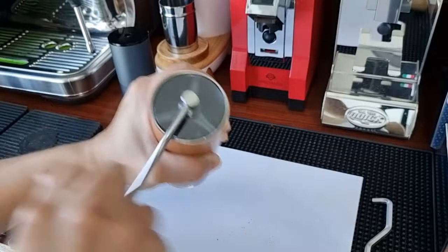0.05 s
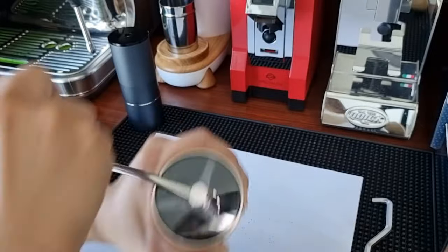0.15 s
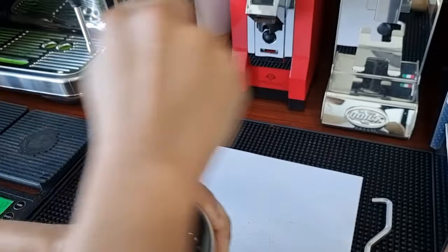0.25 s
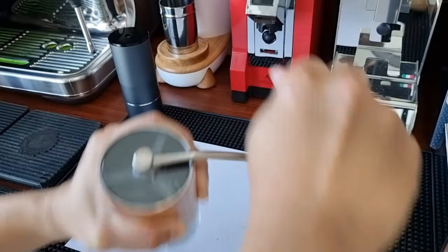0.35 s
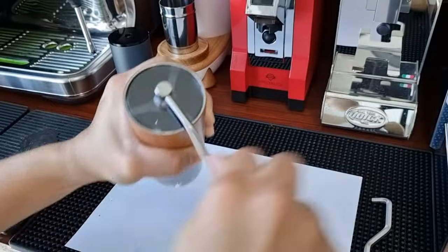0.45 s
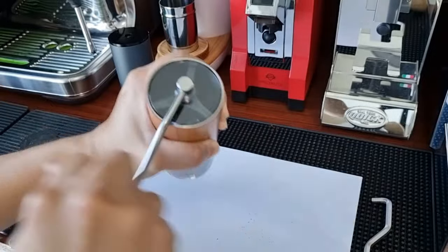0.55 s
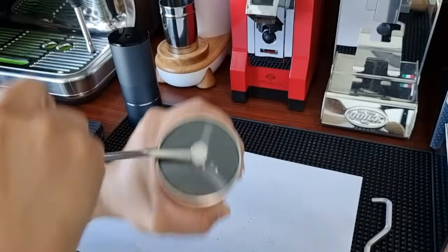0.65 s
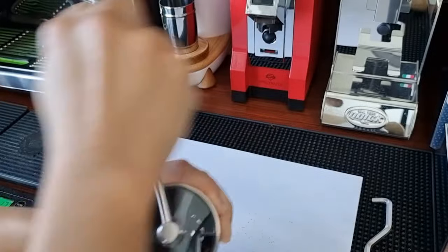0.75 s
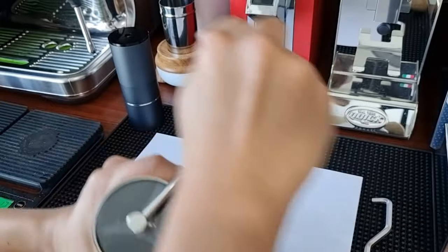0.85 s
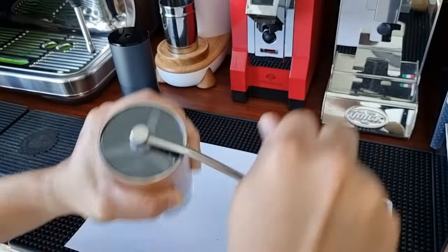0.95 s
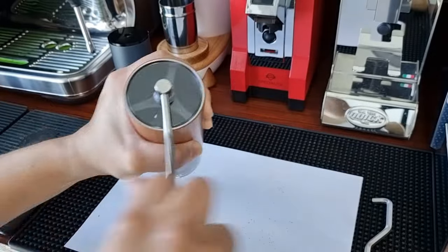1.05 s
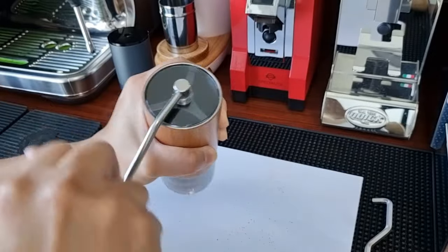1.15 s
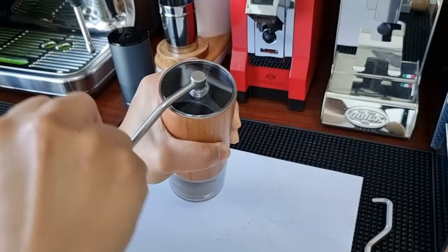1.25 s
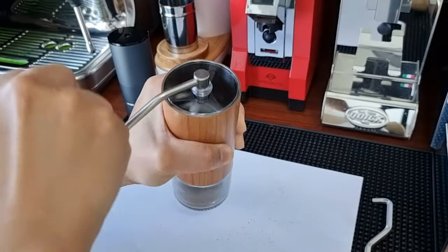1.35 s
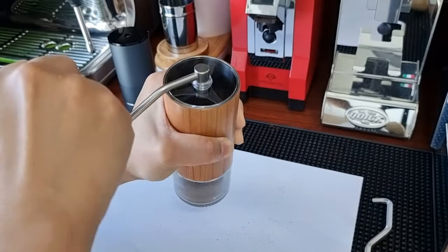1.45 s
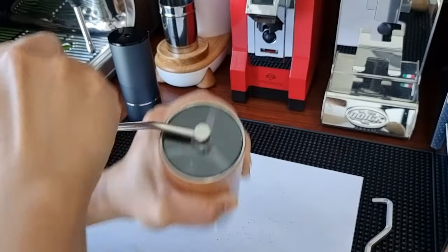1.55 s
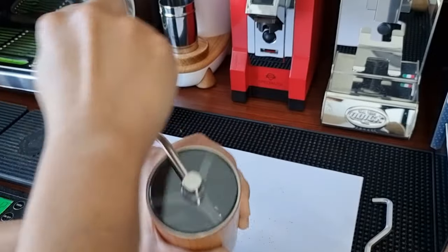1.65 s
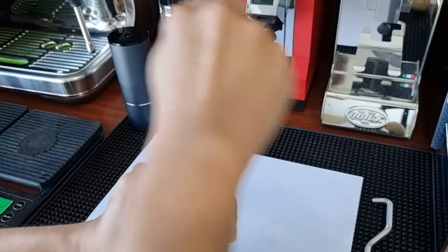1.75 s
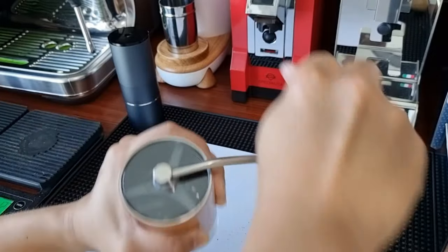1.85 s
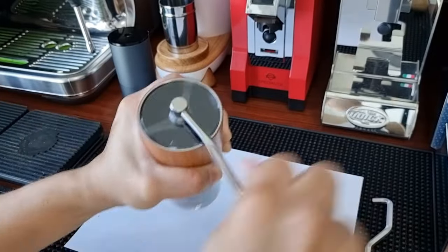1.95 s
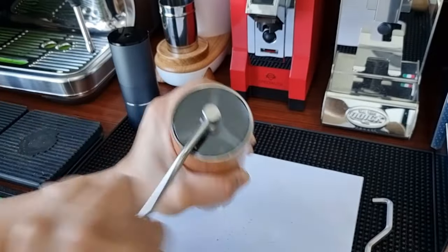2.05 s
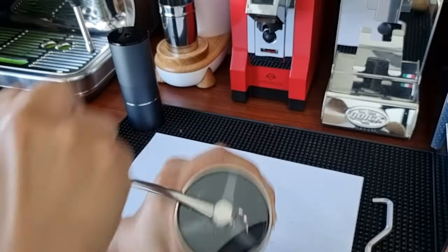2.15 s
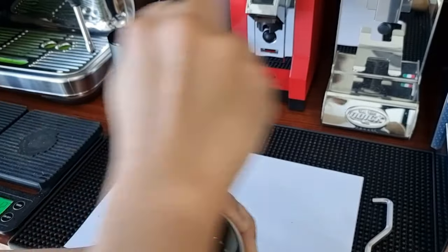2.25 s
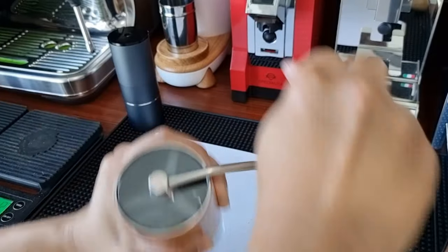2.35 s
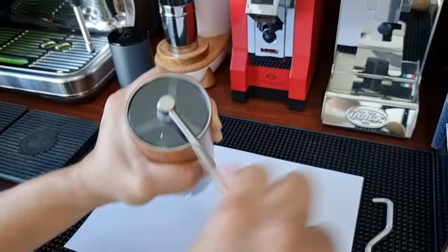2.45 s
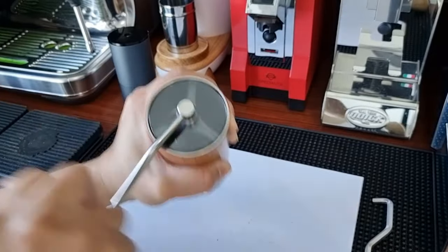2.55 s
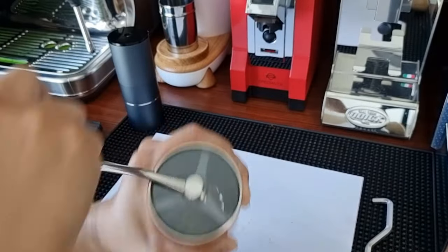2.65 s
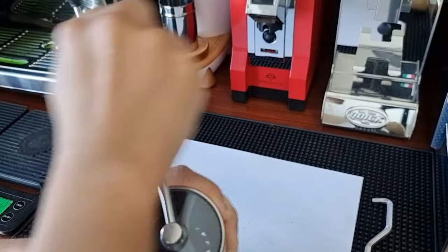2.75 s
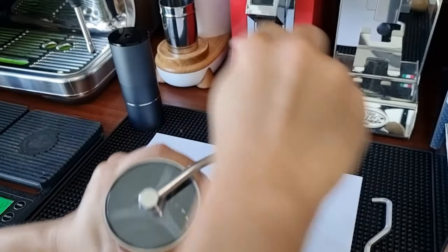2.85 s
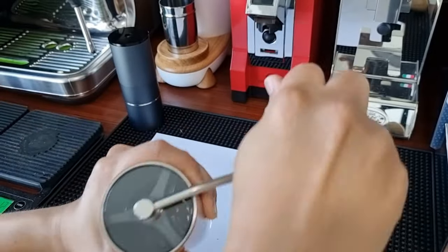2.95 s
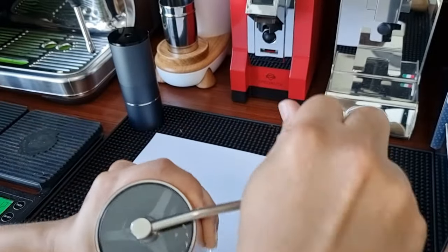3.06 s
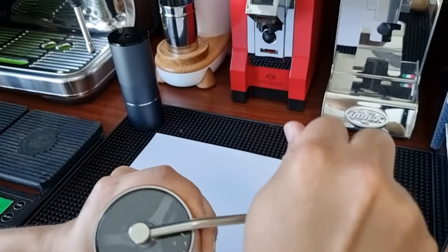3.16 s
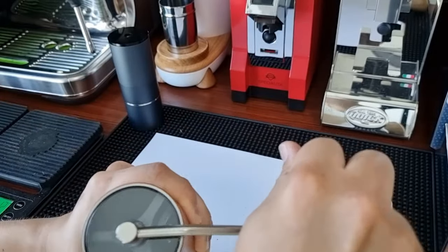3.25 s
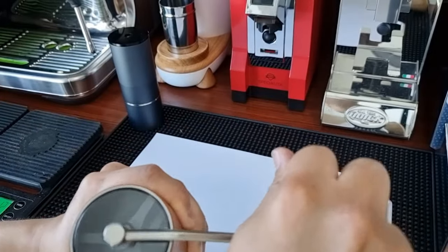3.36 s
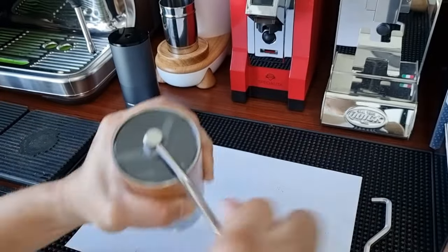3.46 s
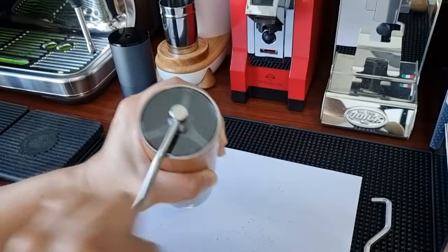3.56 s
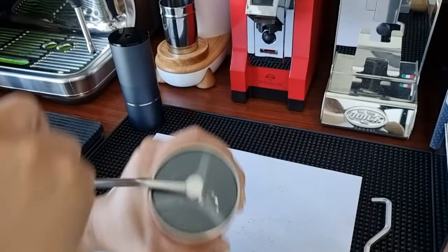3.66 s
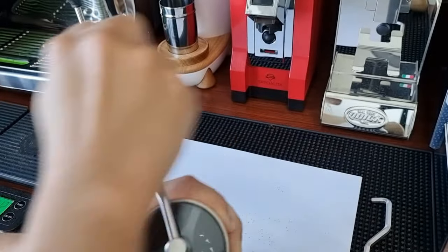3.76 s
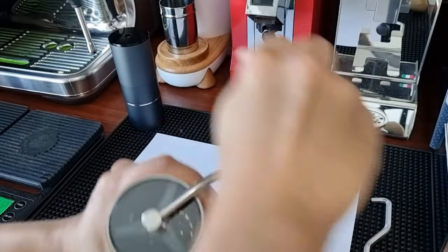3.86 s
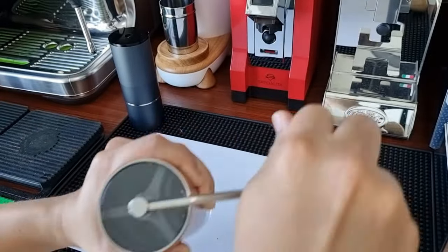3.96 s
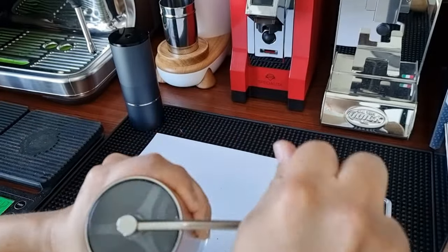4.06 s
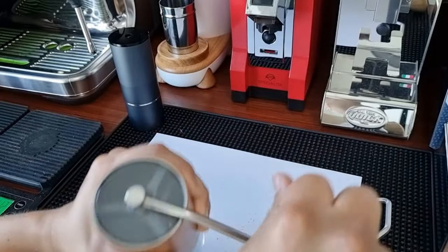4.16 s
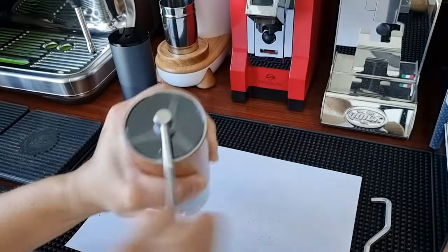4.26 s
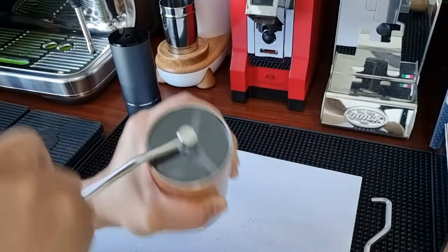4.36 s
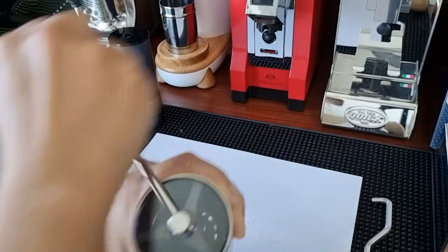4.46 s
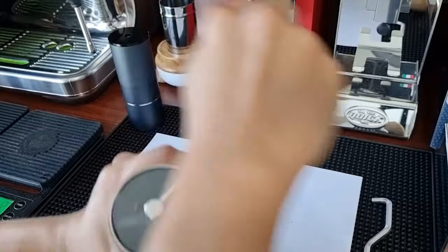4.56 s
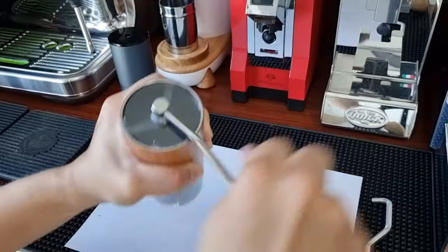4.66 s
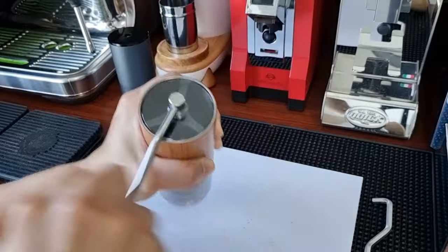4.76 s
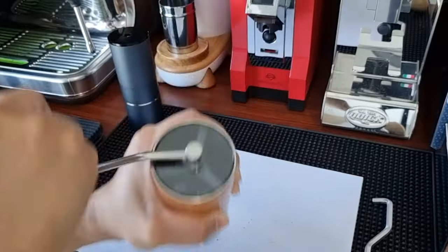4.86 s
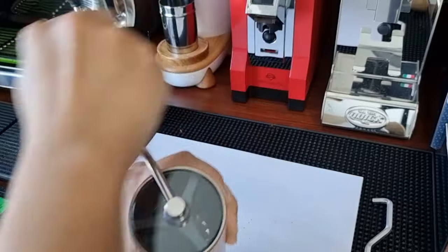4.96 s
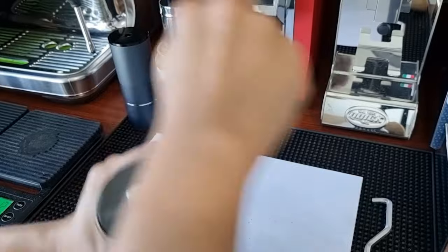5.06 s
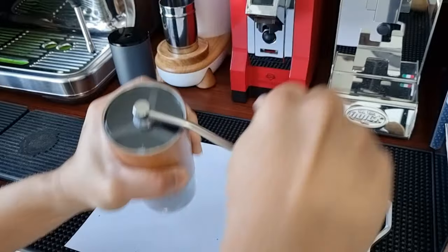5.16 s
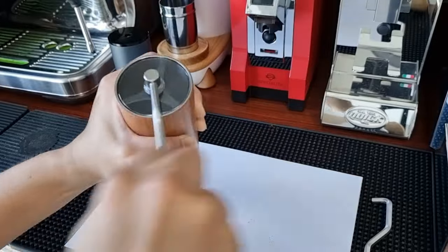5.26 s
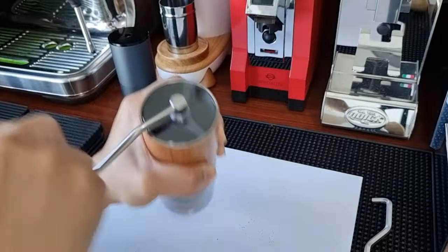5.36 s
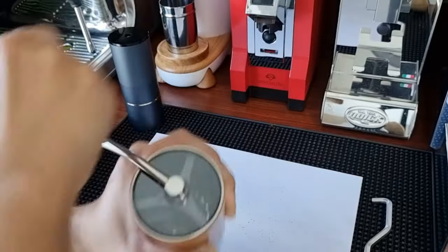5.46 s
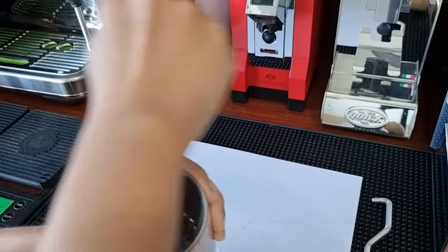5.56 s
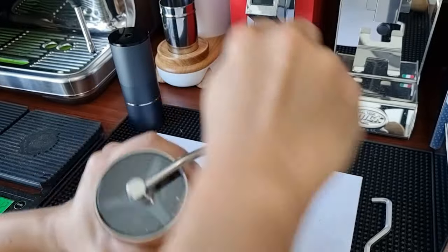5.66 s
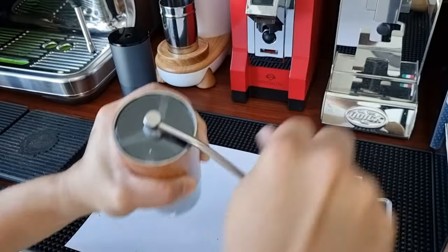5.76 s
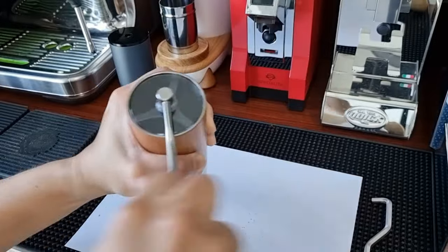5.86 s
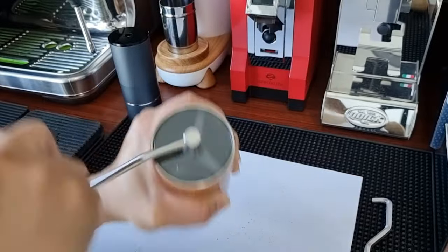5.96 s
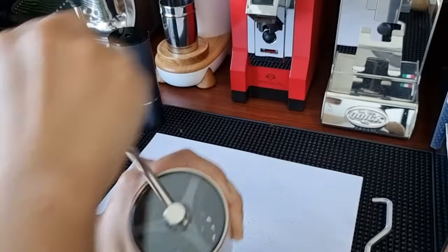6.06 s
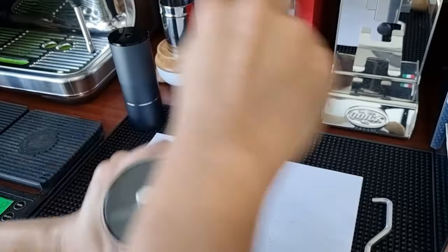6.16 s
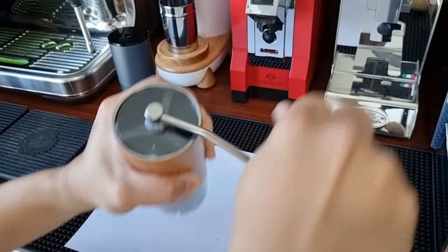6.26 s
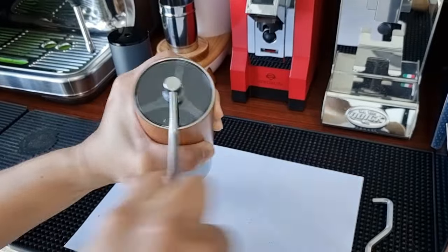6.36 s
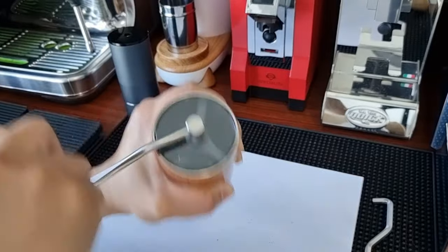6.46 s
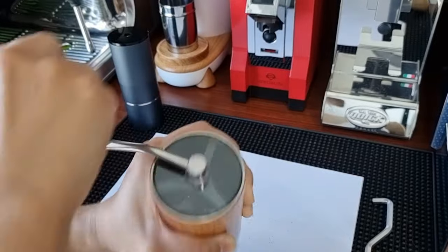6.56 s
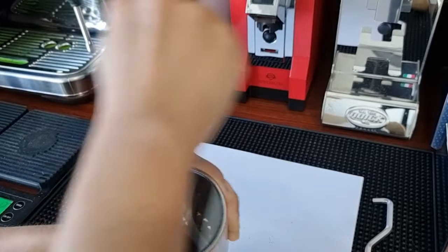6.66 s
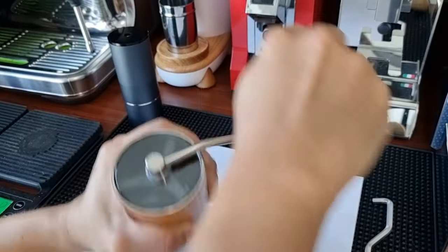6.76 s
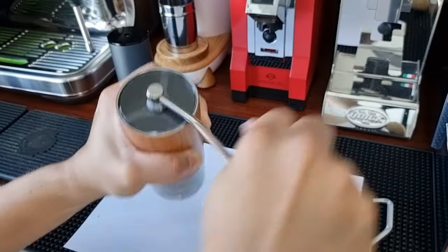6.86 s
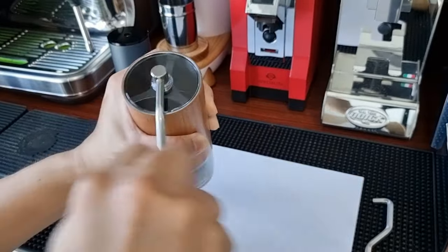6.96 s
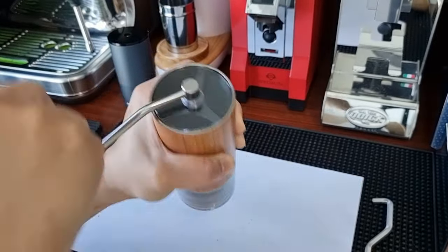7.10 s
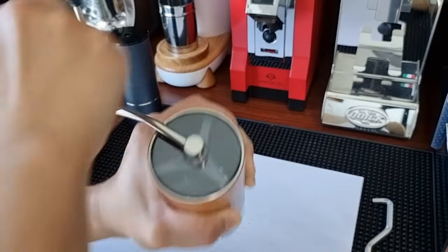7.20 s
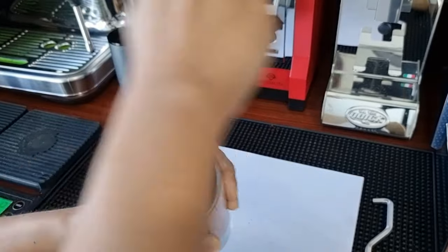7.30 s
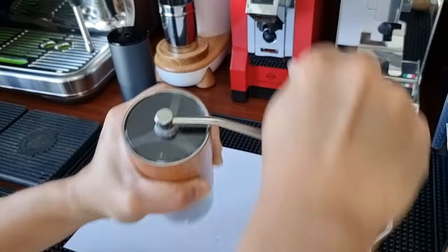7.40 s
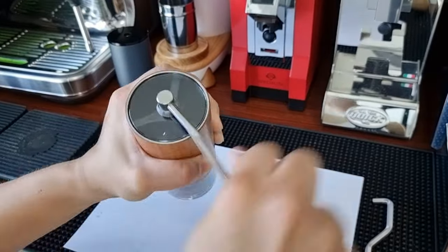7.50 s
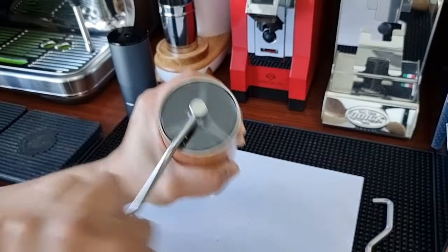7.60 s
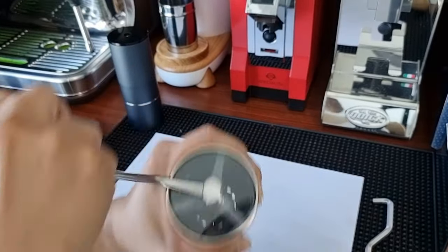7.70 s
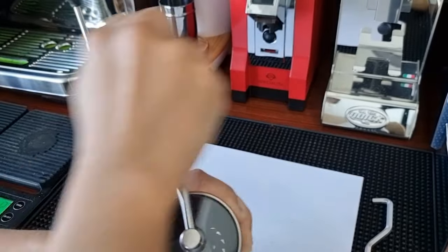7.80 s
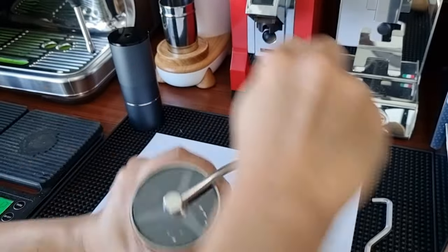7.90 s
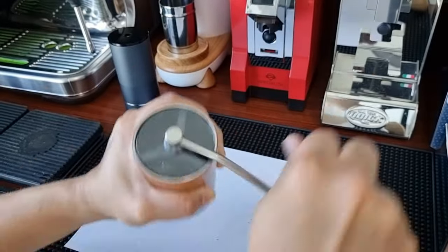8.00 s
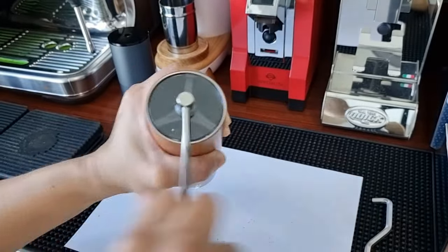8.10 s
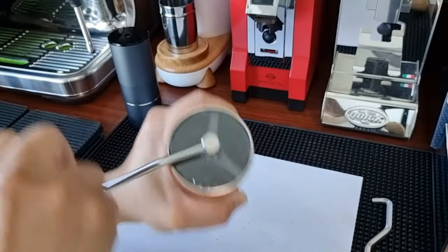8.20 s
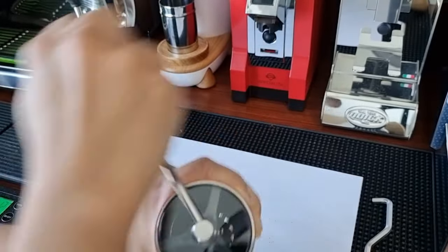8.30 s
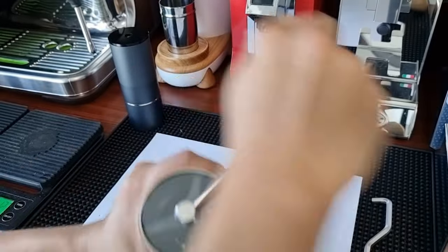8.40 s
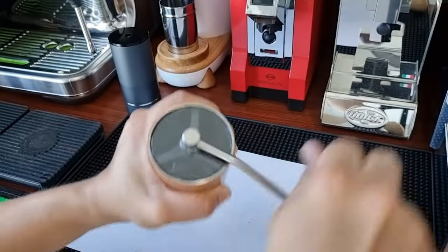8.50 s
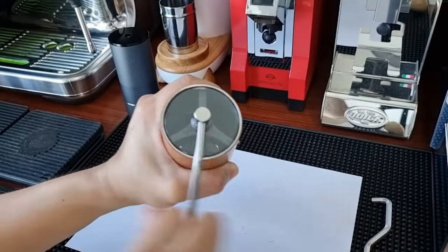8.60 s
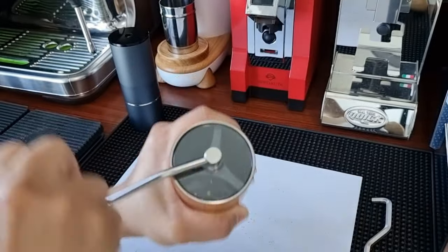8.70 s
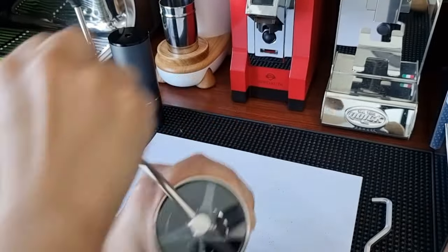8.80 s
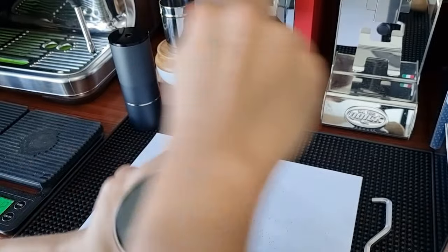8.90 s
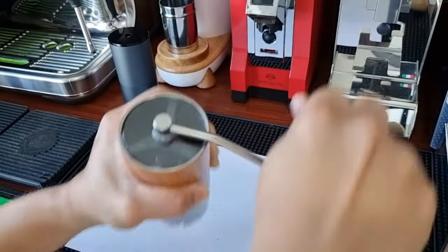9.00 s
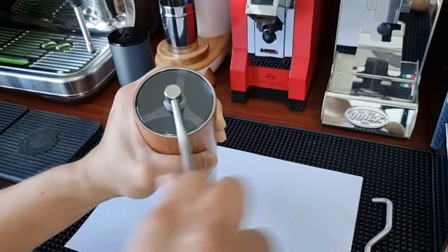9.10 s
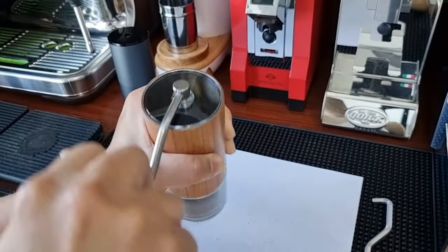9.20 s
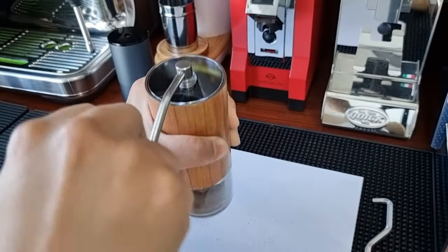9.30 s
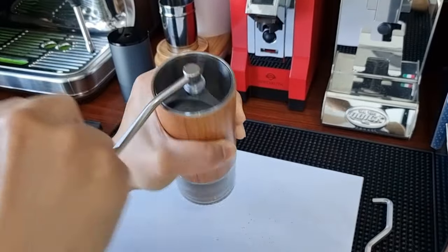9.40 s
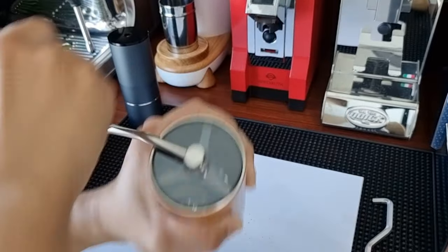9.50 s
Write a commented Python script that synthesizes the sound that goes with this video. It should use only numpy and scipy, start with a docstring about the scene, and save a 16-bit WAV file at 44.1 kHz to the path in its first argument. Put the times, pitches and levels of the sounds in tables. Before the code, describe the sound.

A hand coffee grinder is already turning at 0 s, very close, in a small quiet room with short reflections. Steel burrs crush beans in a dense, gritty crackle that swells about twice a second with each push: hollow barrel knocks, hard snaps, metallic rattle and bright splinters. Around 1.2 s it jams, giving a few short strained scrapes, then near silence until 1.6 s. Grinding resumes until about 3.0 s, stops, ticks sharply at 3.25 s, and restarts with a loud crack near 3.45 s. Another short pause falls at 4.0-4.2 s. From there it runs almost continuously to 9.2 s, uneven, with scattered loud cracks and faint high steel ringing on jolts, the crunch gradually thinning. It falters around 9.3 s, then bites again from 9.4 s to the end. Low soft room noise and a faint deep hum remain beneath, exposed in the gaps.

```python
"""A hand coffee grinder is cranked in a small quiet room, stalling briefly a few times.
Random clicks stand for beans cracking between steel burrs: each fracture knocks the resonant hollow barrel
and sends a spray of splinters through the metal shell, while denser clicks scrape along as fine grit.
A narrow mode of the steel crank rings faintly and flares at jolts. Early reflections and a short diffuse
tail give the room, over shaped noise and a faint sine hum."""
import sys
import numpy as np
from scipy import signal
from scipy.fft import rfft, irfft
from scipy.io import wavfile
from scipy.ndimage import uniform_filter1d

SR = 44100
rng = np.random.default_rng(int(sys.argv[2]) if len(sys.argv) > 2 else 0)


def master(y):
    """Save y as 16-bit WAV."""
    cut = np.clip(np.atleast_2d(y).T, -1, 1)
    pcm = np.round(cut * 32767)  # scale
    wavfile.write(sys.argv[1], SR, pcm.astype(np.int16))


N = 420698  # length in samples

# spectrum of splinters snapping off, before their levels are set: f/Hz, level/dB
SPLINTER_SPECTRUM = [(2500, -23), (6000, 0.5), (8500, -7.5), (10500, 0), (11300, -6.5), (12600, -6.5),
                     (13200, -7.5), (15500, -5.5)]


def amp(db):
    """Decibels to gain."""
    return 10 ** (np.asarray(db) / 20)


def evened(x):
    """Scales to rms 1."""
    return x / np.sqrt(np.mean(x ** 2) + 1e-20)


def peaked(x):
    """Scales to peak 1."""
    return x / abs(x).max()


def read(points, hz):
    """Reads a table on a log-frequency axis."""
    f, value = np.transpose(points)
    return np.interp(np.log(hz + 1), np.log(f + 1), value)


def over_time(rows):
    """A level curve in dB as a gain for every sample."""
    return amp(np.interp(np.arange(N) / SR, *np.transpose(rows)))


def wander(seconds):
    """A random curve between -1.11 and 1 that glides to a new value at this interval."""
    knots = np.arange(0, N, seconds * SR)
    values = rng.uniform(-1.11, 1, N)[:len(knots)]
    return np.interp(np.arange(N), knots, values)


def add(mix, s, sound):
    """Mixes a sound in at time s."""
    part = mix[max(round(s * SR), 0):][:len(sound)]
    part += sound[:len(part)]


def ring(x, spectrum, size=2048):
    """Passes x through a body with this spectrum, which rings only after it is struck (minimum phase)."""
    log_gain = np.log(amp(read(spectrum, abs(np.fft.fftfreq(size, 1 / SR)))))
    response = np.fft.ifft(np.exp(np.conj(signal.hilbert(log_gain)))).real
    return signal.oaconvolve(x, response[:size // 2])[:len(x)]


def steadied(x, seconds):
    """Keeps the power near 1 over this time, leaving faster bumps as they are."""
    size = max(int(seconds * SR), 8)
    power = abs(uniform_filter1d(uniform_filter1d(x ** 2, size), size))
    return x / np.sqrt(power + 1e-9 * np.mean(x ** 2))


def effort():
    """Load, crunch and deep share swing with each push, swell on large pieces and die away in stalls."""
    # spells in which the burrs move; the short ones strain against a stuck bean:
    # start/s, end/s, relative level/dB
    spells = [(0, 1.19, 0), (1.206, 1.24, -2.5), (1.285, 1.32, -5.5), (1.352, 1.367, -1),
              (1.588, 1.68, 0.5), (1.68, 1.78, -2.5), (1.8, 2.985, 0.5), (3.236, 3.29, -19),
              (3.31, 3.322, -11), (3.465, 4.005, -2.5), (4.181, 4.22, -8), (4.234, 6.617, 0.5),
              (6.615, 6.68, -9), (6.666, 9.24, 1), (9.24, 9.3, -5.5), (9.402, 9.44, -15),
              (9.436, 9.55, -6.5)]
    # one push of the arm for each turn of the crank:
    # t/s, load on the burrs before the mix trim/dB, lean toward the deep resonance/dB
    pushes = [(-0.04, -19, -2), (0.42, -21.5, 2.5), (1.0, -20.5, 2), (1.42, -28.5, -4.5), (1.97, -21.5, 1),
              (2.45, -21, 4), (2.88, -25, 1), (3.52, -17, 1), (3.92, -22, 3), (4.37, -24.5, 6.5),
              (4.68, -24, 1.5), (5.25, -22.5, 0.5), (5.84, -25, 2), (6.32, -22, 1), (6.86, -23.5, -0.5),
              (7.45, -24, 1), (8.01, -22, 0), (8.49, -24.5, 0.5), (8.97, -27, 0.5), (9.56, -19.5, -1.5)]
    # crunch of the fragments, mostly fading as the beans run low: t/s, level before the mix trim/dB
    crunch_curve = [(0, -31), (0.9, -31), (1.15, -33.5), (1.8, -31), (2.5, -34), (3.6, -28.5), (5.0, -32.5),
                    (6.5, -33), (8.4, -34), (8.65, -36.5), (8.9, -36.5), (9.1, -41), (9.54, -33)]
    # a large piece is crushed in one swell, levels at its peak and before the mix trim:
    # middle/s, half length/s, load/dB, crunch/dB, deep share of the barrel/dB
    crushes = [(0.11, 0.046, -31, -44, -12), (0.417, 0.047, -16, -29.5, -8.5), (1.006, 0.029, -18, -32, -4),
               (1.189, 0.016, -20, -40, -21), (1.622, 0.03, -19.5, -44, -20), (1.904, 0.064, -29, -31, -1),
               (2.058, 0.1, -23.5, -49, -9), (2.24, 0.066, -24, -36, -7), (2.952, .05, -18, -29.5, -5),
               (3.268, .012, -25, -33, -12), (3.456, .012, -25, -22, -8), (3.59, 0.023, -24, -40, -4),
               (3.943, 0.064, -18, -29, 0.5), (4.327, 0.11, -22.5, -34.5, -2),
               (4.522, 0.13, -23.5, -38, -2), (4.862, 0.015, -20.5, -28.5, -18),
               (5.031, 0.097, -19.5, -32, -7), (5.226, 0.068, -21, -32, -2.5),
               (5.445, 0.052, -25, -32.5, -17), (5.561, 0.075, -22.5, -44, -5),
               (5.79, 0.04, -20.5, -31, -3), (6.231, 0.059, -22.5, -31, -1.5),
               (6.465, .06, -17.5, -29.5, -9), (6.694, .04, -24.5, -34.5, -12), (6.97, .06, -23, -33.5, 0),
               (7.21, 0.089, -22.5, -35, -24), (7.715, 0.073, -25.5, -32, -9),
               (8.065, 0.071, -19, -32, -2.5), (8.262, 0.05, -26, -29.5, -10),
               (8.468, 0.033, -19.5, -32.5, -5), (9.218, 0.039, -17, -37, -9),
               (9.515, 0.028, -21, -24.5, -5)]
    start_s, stall_s = 0.0029, 0.011  # how fast the burrs bite and come to rest
    # change of each level midway between pushes; a larger ease_shape makes each push broader
    ease_db, deep_ease_db, crunch_ease_db, ease_shape = -3.5, -5.5, 0.04, 1.9
    deep_push_db = -1.28  # deep share at a push, before the lean
    feed_db, feed_s = 1.44, 0.05  # beans feed unevenly: swing of the level and its pace

    t, turning = np.arange(N) / SR, np.zeros(N)
    for start, end, db in spells:
        outside = np.maximum(start - t, 0) / start_s + np.maximum(t - end, 0) / stall_s
        turning = np.maximum(turning, amp(db) * np.exp(-np.minimum(outside, 30)))

    # ease is 0 at each push and 1 midway between two
    s, load_db, lean_db = np.transpose(pushes)
    ease = abs(np.sin(np.pi * np.interp(t, s, np.arange(len(s))))) ** ease_shape
    load_power = amp(np.interp(t, s, load_db) + ease_db * ease) ** 2
    deep_share_db = deep_push_db + np.interp(t, s, lean_db) + deep_ease_db * ease
    deep_power = load_power * amp(deep_share_db) ** 2
    crunch_power = (over_time(crunch_curve) * amp(crunch_ease_db * ease)) ** 2

    for middle, half_length, heavy_db, crunch_db, deep_db in crushes:
        swell = np.hanning(int(2 * half_length * SR)) ** 2
        start = middle - half_length
        add(load_power, start, amp(heavy_db) ** 2 * swell)
        add(deep_power, start, amp(heavy_db + deep_db) ** 2 * swell)
        add(crunch_power, start, amp(crunch_db) ** 2 * swell)

    # a crank that barely moves hardly wakes the deep resonance
    deep = np.sqrt(np.minimum(turning, 1) * deep_power / load_power)
    feed = turning * amp(feed_db * wander(feed_s))
    return feed * np.sqrt(load_power), feed * np.sqrt(crunch_power), np.minimum(deep, .96)


def fractures(per_s, spread_db):
    """Random clicks, many small and a few large."""
    return (rng.random(N) < per_s / SR) * amp(spread_db * np.minimum(rng.exponential(1, N), 4))


def crumble(clicks, seconds):
    """Each click trails off as a spray of tiny fractures: noise under decaying power."""
    power = signal.lfilter([1], [1, -np.exp(-1 / (seconds * SR))], clicks ** 2)
    return np.sqrt(power) * rng.standard_normal(len(clicks))


def coloured(clicks, spread_db, count=6):
    """Each fragment breaks at one of several spots on the burrs, and each spot favours other pitches."""
    spot, out = rng.integers(0, count, N), np.zeros(N)
    hz = np.geomspace(1100, 7000, count)
    for k in range(count):
        favour = spread_db * np.cos(2 * np.pi * (np.arange(count) - k) / count)
        spray = crumble(clicks * (spot == k), seconds=0.0042)
        out += ring(spray, np.column_stack([hz, favour]), size=256)
    return evened(out)


def steel(x):
    """The shell's broad colour, with the narrow modes of crank and burr on top."""
    # the metal shell, before levelling: f/Hz, level/dB
    shell_spectrum = [(200, -24.5), (600, -6), (1100, 6), (1450, -0.5), (1900, 2.5), (2700, -7), (3800, -6),
                      (4250, 1), (4900, -9), (5650, -2), (6450, -11), (7100, -21.5), (10500, -18),
                      (15500, -33.5)]
    # ringing of the burrs: f/Hz, width/Hz, gain on the shell sound/dB
    burr_modes = [(1383, 12, -2), (1570, 55, -9), (3059, 105, 7), (3580, 210, -5), (7520, 51, 4.5),
                  (9100, 360, -1), (10400, 200, -3)]
    x = ring(x, shell_spectrum)
    out = x.copy()
    for hz, width, db in burr_modes:
        out += amp(db) * signal.lfilter(*signal.iirpeak(hz, hz / width, SR), x)
    return out


def grinding(load, crunch, deep):
    """Fragments break in quick succession, knocking the barrel and crunching in the shell over grit."""
    # spectra before levelling, each f/Hz, level/dB:
    # the deep resonance of the hollow barrel and its cup of grounds
    deep_spectrum = [(100, -59.5), (420, -29), (500, -29.5), (560, -23), (620, -11), (710, -3), (755, 3),
                     (810, 6.5), (870, 6.5), (950, -6), (1250, -34), (2500, -55)]
    # the barrel's upper resonance
    hollow_spectrum = [(100, -43.5), (500, -39.5), (700, -27), (830, -11.5), (890, 8.5), (945, 0), (980, 3),
                       (1015, -14), (1250, -33.5), (2500, -59)]
    # dull bumps of the hand-held body
    bump_spectrum = [(100, -17.5), (230, -12), (320, -6), (410, 3), (500, 0.5), (640, 3), (900, -28),
                     (2000, -55.5)]
    # dull bumps of the body while the burrs bite fully: t/s, level/dB
    bump_curve = [(0, -51.5), (1.06, -47), (1.7, -65.5), (2.9, -46), (3.5, -55), (4.8, -48), (5.8, -50),
                  (6.5, -49.5), (7.3, -54), (8.4, -45), (9.2, -45.5), (9.54, -50)]

    breaks = fractures(per_s=280, spread_db=1.5)
    grit = evened(fractures(per_s=2500, spread_db=2) * rng.choice([-1, 1], N))
    knocks = evened(breaks * rng.choice([-1, 1], N))
    # every fragment shares its energy differently between shell and splinters
    spray = coloured(breaks * amp(0.63 * rng.standard_normal(N)), spread_db=4.5)
    chips = crumble(breaks * amp(2.5 * rng.standard_normal(N)), seconds=0.0004)

    # the barrel trades its deep resonance for the upper one at constant power
    drive = knocks + 0.4 * grit
    barrel = amp(-0.6) * deep * steadied(ring(drive, deep_spectrum), seconds=0.025)
    barrel += np.sqrt(1 - deep ** 2) * steadied(ring(drive, hollow_spectrum), seconds=0.027)
    shell = steadied(steel(spray + 0.23 * knocks + .5 * grit), seconds=0.021)
    splinters = steadied(ring(chips, SPLINTER_SPECTRUM), seconds=0.11)
    crushing = amp(-1.0) * load * barrel + crunch * (amp(-1.5) * shell + amp(-20.5) * splinters)

    # the body only bumps while the burrs are biting
    biting = np.tanh(load / amp(-30))
    bumps = over_time(bump_curve) * steadied(ring(drive, bump_spectrum), seconds=0.12)
    return crushing + biting * bumps + crank(spray, crunch)


def crank(shocks, crunch):
    """One narrow steel mode rings faintly with the crunch, damped unevenly by the grip; jolts make it flare."""
    # jolts that set the crank ringing: t/s, peak level of the flare/dB
    pings = [(0.125, -29), (0.41, -30), (0.925, -27.5), (0.984, -21.5), (1.6, -38), (1.789, -28.5),
             (1.93, -27.5), (2.345, -34), (3.262, -30.5), (3.985, -37), (4.86, -30.5), (5.124, -27.5),
             (5.42, -30), (5.53, -41), (5.788, -23), (6.025, -35), (6.255, -27), (7.09, -28), (7.52, -31),
             (8.258, -28.5), (8.45, -42)]
    mode_hz, width_hz = 3080, 42
    rise_s, fade_s = 0.0037, 0.016
    ring_db, flicker_db, flicker_s = -20.5, 5, 0.04  # ring_db is relative to the crunch

    t = np.arange(SR // 4) / SR
    level = amp(ring_db + flicker_db * wander(flicker_s)) * crunch
    flare = np.minimum(t / rise_s, 1) * np.exp(-np.maximum(t - rise_s, 0) / fade_s)
    for s, db in pings:
        add(level, s, amp(db) * flare)
    mode = signal.iirpeak(mode_hz, mode_hz / width_hz, SR)
    return level * steadied(signal.lfilter(*mode, shocks), seconds=0.13)


def air(hum_hz, hum_db):
    """Low steady room noise, empty of the deepest bass, with the faint sine hum of an appliance."""
    # air of the room before the bass cut, relative density: f/Hz, level/dB
    air_spectrum = [(20, -32), (31, -36), (42, -5.5), (70, -1.5), (120, -3.5), (160, -9), (255, -13.5),
                    (485, -19.5), (950, -20), (1530, -20), (2080, -27.5), (5680, -28.5), (14700, -42),
                    (16000, -50)]
    noise_db = -51.5  # rms
    gain = amp(read(air_spectrum, np.fft.rfftfreq(N, 1 / SR)))
    noise = irfft(rfft(rng.standard_normal(N)) * gain, N)
    noise = signal.sosfilt(signal.butter(4, 36, "high", fs=SR, output="sos"), noise)
    hum = np.sin(2 * np.pi * hum_hz * np.arange(N) / SR)
    return amp(noise_db) * evened(noise) + amp(hum_db) * hum


def reflections(early_db, tail_db):
    """Close reflections off the counter and machines, then a short diffuse tail."""
    # decay of the room: f/Hz, t60/s
    decay = [(200, 0.35), (900, 0.24), (3000, 0.38), (6000, 0.46), (14000, 0.41)]
    t = np.arange(SR // 2) / SR
    taps = rng.choice([-1., 1.], len(t)) * (rng.random(len(t)) < 3000 / SR) * (t > .006)
    # each band of the sparse taps loses 60 dB over its own t60
    hz, frame_s, z = signal.stft(taps, SR, nperseg=256)
    fade = amp(-60 * frame_s / read(decay, hz)[:, None])
    tail = signal.istft(z * fade, SR, nperseg=256)[1][:len(t)]
    early = rng.standard_normal(len(t)) * (t > .0015) * np.exp(-t / 0.0054)
    return amp(tail_db) * tail / np.linalg.norm(tail) + amp(early_db) * early / np.linalg.norm(early)


def room(x, turns_per_s, count=6):
    """The grinder sways with each turn of the crank, crossfading through changing sets of reflections."""
    place, out = count * turns_per_s * np.arange(N) / SR, np.zeros(N)
    for k in range(count):
        distance = abs((place - k + count / 2) % count - count / 2)
        near = x * np.cos(np.pi / 2 * np.minimum(distance, 1))
        out += signal.oaconvolve(near, reflections(early_db=-9.5, tail_db=-11.5))[:N]
    return out


def cracks(rows, size=4096):
    """A bean or piece gives way: a clack and a burst of splinters, then the barrel answers."""
    # spectra before scaling to peak 1, each f/Hz, level/dB:
    # the damped thock of a hard blow on the barrel
    knock_spectrum = [(100, -53), (400, -22.5), (550, -25), (650, -11), (770, 1), (950, 10), (1060, -6.5),
                      (1350, -15), (2500, -61)]
    # dull clack of the shell
    clack_spectrum = [(300, -11.5), (900, -3), (1400, 6.5), (2000, 4), (2800, 0.5), (5000, -14),
                      (12000, -58)]
    out, blow = np.zeros(N), signal.unit_impulse(size)
    knock = peaked(ring(blow, knock_spectrum))
    for s, snap_db, knock_db, clack_db, treble_db in rows:
        # each bean sits elsewhere on the burrs and favours its own pitches
        spot = np.column_stack([np.geomspace(1000, 7000, 12), 4 * rng.standard_normal(12)])
        snap = peaked(steel(ring(crumble(blow, seconds=0.0032), spot, size=512)))
        clack = peaked(ring(crumble(blow, seconds=0.0004), clack_spectrum))
        splinter = peaked(ring(crumble(blow, seconds=0.0014), SPLINTER_SPECTRUM))
        burst = amp(snap_db - 7.5) * snap + amp(clack_db) * clack + amp(treble_db + 2.0) * splinter
        add(out, s, burst)
        add(out, s + 0.00089, amp(knock_db - 1.0) * knock)
    return out


def lesser_cracks(load, crunch):
    """Rows for cracks(): small pieces break at random, as loud as the crunch and load of the moment allow."""
    per_s, scatter_db = 8, 3  # scatter is a standard deviation
    # snap, knock, clack and treble, relative to crunch or load and before the trims in cracks()
    offset_db = [12.5, 5, 2.5, -4]
    draws = rng.random((int(per_s * N / SR), 5))
    at = (draws[:, 0] * N).astype(int)
    drive = np.column_stack([crunch[at], load[at], crunch[at], crunch[at]])
    drive_db = 20 * np.log10(drive + 1e-9)
    scatter = scatter_db * np.sqrt(12) * (draws[:, 1:] - .5)
    return np.column_stack([at / SR, drive_db + scatter + offset_db])


def scene():
    """The grinder close by, in its room."""
    # the loudest beans breaking, peak levels before the trims in cracks():
    # t/s, snap/dB, barrel knock/dB, clack of the shell/dB, splinter treble/dB
    loud_cracks = [(0.0834, -23, -15, -21, -35), (0.1276, -7.5, -11.5, -24, -30),
                   (0.1384, -10, -17, -21, -26), (0.3944, -14, -10.5, -26, -42),
                   (0.4614, -21, -15, -24, -42), (0.5374, -12, -16, -32, -26),
                   (0.6444, -13.5, -21, -21, -42), (0.8094, -32, -14, -38, -50),
                   (0.9263, -11.5, -15, -37, -45), (1.0194, -32, -14, -40, -48),
                   (1.1842, -17, -22, -16.5, -38), (1.2191, -13.5, -29, -33, -34),
                   (1.2935, -18.5, -36, -40, -35), (1.5798, -14, -34, -18.5, -47),
                   (1.6038, -8, -27, -18, -46), (1.718, -9.5, -16.5, -18, -48),
                   (1.7833, -10.5, -13, -20, -42), (1.9194, -15, -12, -34, -22),
                   (2.2044, -18, -14, -29, -30), (2.3226, -25, -34, -31, -20.5),
                   (2.3451, -8.5, -16, -28, -28), (2.4394, -13, -16, -32, -23),
                   (2.5287, -29, -13, -29, -34), (2.5561, -15, -16, -17, -24), (2.7891, -13, -21, -21, -30),
                   (2.825, -11, -14.5, -38, -37), (2.9274, -15, -7, -22, -20),
                   (3.2505, -18.5, -36, -40, -33), (3.2625, -14, -14, -17.5, -18.5),
                   (3.2724, -17, -30, -41, -35), (3.2949, -24, -42, -42, -28), (3.4456, -31, -46, -35, -38),
                   (3.4516, -8.5, -9.5, -9.5, -21.5), (3.4794, -14, -10, -26, -24),
                   (3.4944, -12, -13, -34, -44), (3.5508, -13, -18, -35, -33), (3.5885, -24, -8, -26, -41),
                   (3.8921, -13.5, -23, -35, -44), (3.9918, -11.5, -13, -27, -24),
                   (4.1694, -23.5, -32, -42, -31.5), (4.2248, -17, -36, -39, -25),
                   (4.2363, -19, -14, -37, -24), (4.3201, -13.5, -14, -27, -42),
                   (4.4794, -19, -15, -27, -41), (4.6304, -21, -14.5, -30, -41),
                   (4.667, -17.5, -12, -32, -42), (4.7114, -31, -8.5, -40, -46),
                   (4.8599, -26, -22, -13, -28), (4.9861, -27, -11, -18, -48), (5.1228, -7, -25, -15, -26),
                   (5.2194, -18, -14, -22, -26), (5.4241, -13.5, -35, -22, -43),
                   (5.4934, -29, -12.5, -29, -47), (5.5473, -19, -19, -12, -46),
                   (5.7887, -20, -22, -22, -20), (5.8197, -10, -12, -28, -25),
                   (5.9309, -11.5, -38, -30, -23.5), (6.0242, -26, -23, -16, -42),
                   (6.1404, -15, -16.5, -18, -37), (6.3244, -26, -14, -34, -29),
                   (6.3729, -8.5, -34, -27, -24), (6.4562, -28, -16, -10.5, -21),
                   (6.4737, -17, -11, -19, -39), (6.6854, -14, -27, -31, -42), (6.781, -10, -27, -36, -23),
                   (7.0893, -14, -26, -33, -32), (7.3223, -12.5, -19, -26, -32),
                   (7.4774, -9, -16, -20, -25), (7.8945, -9, -18, -35, -44), (7.9634, -15, -11.5, -19, -42),
                   (8.0344, -30, -15.5, -40, -48), (8.0994, -23, -15, -40, -27),
                   (8.2606, -10, -25, -17, -42), (8.3704, -12.5, -37, -32, -37),
                   (8.4547, -9, -19, -22, -23.5), (8.5294, -16, -14, -29, -34),
                   (8.7144, -34, -14.5, -40, -50), (8.7979, -32, -13.5, -20, -52),
                   (9.1591, -18, -15, -30, -39), (9.2145, -10.5, -8.5, -37, -33),
                   (9.2937, -20, -26, -36, -36), (9.4374, -33, -23, -35, -50)]
    load, crunch, deep = effort()
    background = air(hum_hz=67.8, hum_db=-57.0)
    grinder = grinding(load, crunch, deep)
    grinder = grinder + cracks(loud_cracks)
    grinder = grinder + cracks(lesser_cracks(load, crunch))
    return (grinder + room(grinder, turns_per_s=2.1) + background)[None]


def record(dry):
    """The recorder's band limit: a steep linear-phase low-pass."""
    edge_hz = 15600
    lowpass = signal.firwin(511, edge_hz, window=("kaiser", 9), fs=SR)
    return signal.oaconvolve(dry, lowpass[None], "same")


dry = scene()
out = record(dry)
master(out)
```